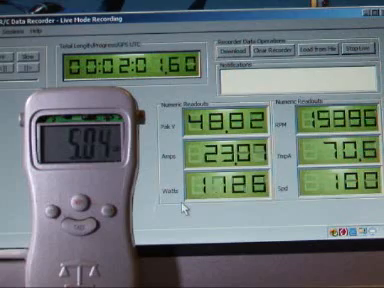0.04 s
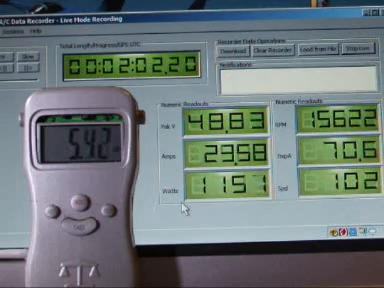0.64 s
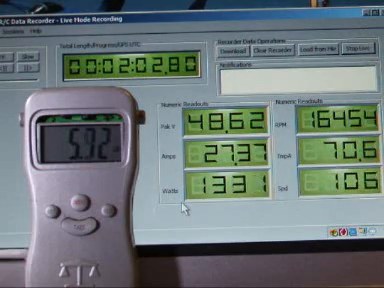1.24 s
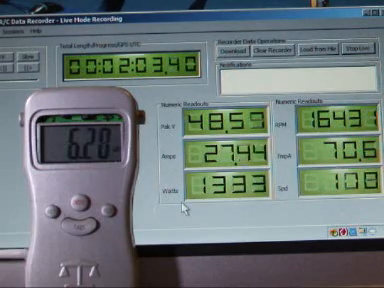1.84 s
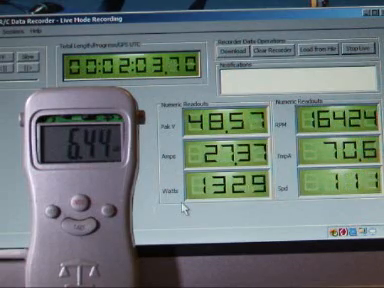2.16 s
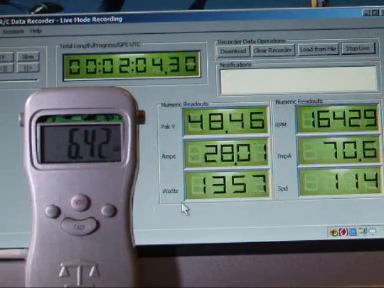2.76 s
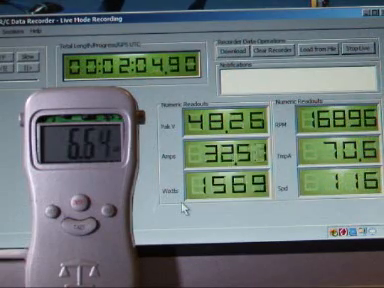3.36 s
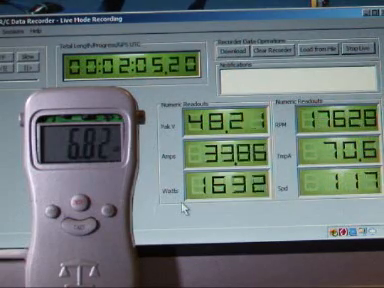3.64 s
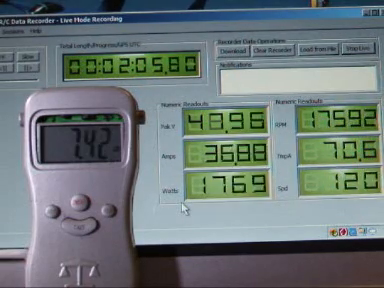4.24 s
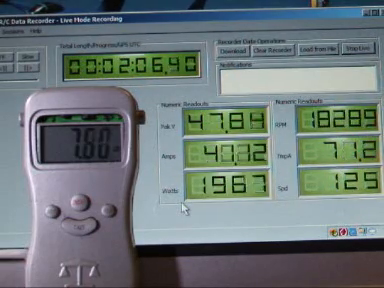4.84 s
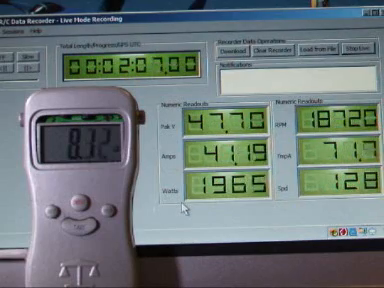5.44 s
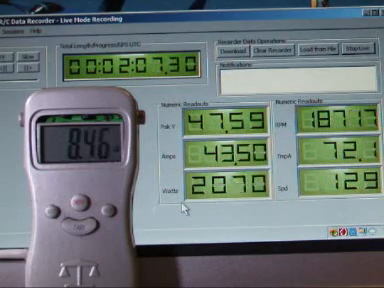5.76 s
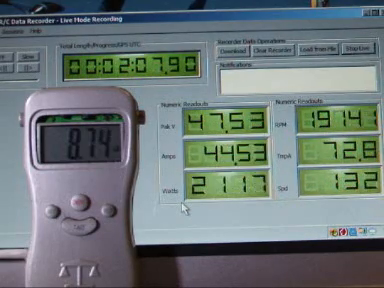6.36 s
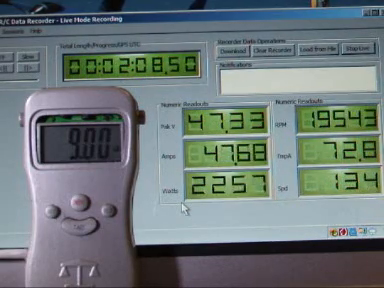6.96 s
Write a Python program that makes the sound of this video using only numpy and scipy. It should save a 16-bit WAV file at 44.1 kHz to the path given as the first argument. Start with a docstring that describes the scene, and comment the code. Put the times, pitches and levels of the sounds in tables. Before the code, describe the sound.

An electric ducted fan runs with a high, fluttering whine over rushing air, its pitch climbing in small steps.

```python
"""First you hear a high, fluttering whine over rushing air: an electric fan spinning inside a tube.
It sits on a test stand and is sped up in small steps, so its tones climb in pitch together.
Its eleven blades chop the swirling air, making the whine and a shriek an octave above it.
The shaft hums, the motor and ball bearings sing through the housing, and the jet of air
buffets the microphone. Twice, a thin whistle from the bearings comes and goes."""
import sys
import numpy as np
from scipy import signal
from scipy.fft import rfft, irfft
from scipy.io import wavfile
from scipy.ndimage import uniform_filter1d

SR = 44100
rng = np.random.default_rng(int(sys.argv[2]) if len(sys.argv) > 2 else 0)


def int16_out(signal):
    """Quantize to a 16-bit WAV file."""
    q = np.round(np.clip(np.atleast_2d(signal).T, -1, 1) * 32767)
    wavfile.write(sys.argv[1], SR, q.astype(np.int16))


N = 317079


def from_db(db):
    """Turn decibels (dB) into a number to multiply a sound by."""
    return 10 ** (np.asarray(db) / 20)


def rms_one(x):
    """Scale a signal so that its average power is 1."""
    return x / np.sqrt(np.mean(np.abs(x) ** 2) + 1e-20)


def drift(rate):
    """A smooth random wobble, about 1 in size; a higher rate (per second) wobbles faster."""
    keep = np.exp(-40 * np.pi * rate / SR)
    noise = rng.standard_normal(N // 20 + 4002)  # one value for every 20 samples
    slow = signal.lfilter([1], [1, -2 * keep, keep * keep], noise)[4000:]  # smoothed twice
    return np.interp(np.arange(N) / 20, np.arange(len(slow)), rms_one(slow))


def level(curve, wobble_db, wobble_rate=7.0, trim_db=0):
    """A volume that follows a table, shifted by trim_db, and swells and fades at random."""
    seconds, db = np.transpose(curve)
    return from_db(np.interp(np.arange(N) / SR, seconds, db) + trim_db + wobble_db * drift(wobble_rate))


def tone(turns, cycles_per_turn, flutter):
    """A tone tied to the shaft and shaken by swirling air; flutter lists (rate, strength in dB) pairs."""
    shake = 1 + sum(from_db(db) * (drift(rate) + 1j * drift(rate)) / np.sqrt(2) for rate, db in flutter)
    phase = 2 * np.pi * (cycles_per_turn * turns + rng.random())
    return np.sqrt(2) * np.real(rms_one(shake) * np.exp(1j * phase))


def boost_db(tone_hz, resonances):
    """How much louder a tone gets near a resonance, a pitch at which a part likes to ring."""
    return sum(boost / (1 + (2 * (tone_hz - hz) / width) ** 2) for hz, width, boost in resonances)


def ringing(tone_hz, resonances, base_db, build_s=.06):
    """The volume of a tone that swells and dies away as it slides through resonances."""
    return from_db(base_db + uniform_filter1d(boost_db(tone_hz, resonances), int(build_s * SR)))


def air_noise(colour):
    """Noise shaped by a table of pitches and strengths, dying away beyond the table's ends."""
    hz, db = np.transpose(colour)
    f = np.maximum(np.arange(N // 2 + 1) * SR / N, 1)
    ends = 1 / (1 + (hz[0] / f / 2) ** 4) / (1 + (f / hz[-1] / 2) ** 8)
    shape = from_db(np.interp(np.log(f), np.log(hz), db)) * ends
    return rms_one(irfft(rfft(rng.standard_normal(N)) * shape, N))


def room(x, echo_db, die_away_s=0.28, even_s=0.17):
    """Echoes of the earlier pitch clash with a sliding tone, so it rasps; slow swells are evened out."""
    t = np.arange(SR // 2) / SR
    echoes = rng.standard_normal(len(t)) * from_db(-60 * t / die_away_s)
    mix = x + from_db(echo_db) * signal.fftconvolve(x, echoes / np.linalg.norm(echoes))[:N]
    return mix / np.sqrt(uniform_filter1d(mix ** 2, int(even_s * SR)) + 1e-9)


# Steps of the throttle. Each row: start in seconds, new shaft speed in turns per second.
SPEED_STEPS = [(0.033, 257.2), (0.548, 261.4), (0.747, 269.7), (0.892, 274.5), (2.614, 277.9),
               (2.828, 282.2), (3.167, 290.3), (3.466, 294.3), (4.185, 297.8), (4.282, 301.6),
               (4.528, 305.8), (4.75, 309.5), (4.88, 312.9), (5.723, 316.1), (5.86, 319.7), (6.757, 326.6)]


def shaft_speed(start_speed=251.4, lag_s=.038):
    """After each step of the throttle, the fan takes a moment to reach its new speed."""
    t = np.arange(N) / SR
    starts, speeds = np.transpose(SPEED_STEPS)
    rises = np.diff(speeds, prepend=start_speed)
    return start_speed + sum(rise * (1 - np.exp(-np.maximum(t - start, 0) / lag_s))
                             for start, rise in zip(starts, rises))


# How loud the two blade tones are. Each row: time in seconds, level in dB before any trim.
WHINE_LEVELS = [(0.0, -29), (0.63, -30), (1.12, -37.5), (1.22, -26.0), (1.82, -34.5), (1.9, -25.5),
                (2.0, -34.5), (2.59, -27.5), (2.65, -24), (2.711, -31.5), (3.31, -33), (3.41, -37.5),
                (3.65, -26.5), (4.24, -29), (4.61, -39.5), (4.76, -31.6), (5.78, -29), (5.94, -38),
                (6.02, -29), (6.57, -25.5), (6.63, -34.5), (6.78, -24), (6.84, -30.5), (7.19, -27.5)]
SHRIEK_LEVELS = [(0.0, -30.4), (0.49, -34), (0.96, -22), (1.02, -29), (1.69, -29), (1.76, -24),
                 (2.2, -33.0), (2.27, -28.5), (2.59, -29.5), (2.65, -24.5), (3.12, -32), (3.31, -20.5),
                 (3.88, -27), (4.1, -22), (4.16, -29.9), (4.69, -20), (5.1, -31.5), (5.49, -25.5),
                 (5.61, -30.5), (6.1, -24), (6.33, -28.5), (6.94, -20.5), (7.1, -29), (7.19, -26)]
# How swirling air shakes them. Each row: rate per second, strength in dB next to the steady tone.
WHINE_SHAKES = [(12, -11.5), (50, -16)]
SHRIEK_SHAKES = [(20, -4), (55, -9)]


def blades(turns, count=11):
    """Blades chop uneven air into a whine; the shriek, an octave up, flutters and echoes more."""
    whine = room(tone(turns, count, WHINE_SHAKES), echo_db=-5)
    shriek = room(tone(turns, 2 * count, SHRIEK_SHAKES), echo_db=-2)
    tips = blade_tips(turns, count, width_hz=78, level_db=-39.5)
    tips += blade_tips(turns, 2 * count, width_hz=160, level_db=-33)
    whine *= level(WHINE_LEVELS, wobble_db=1.3)
    shriek *= level(SHRIEK_LEVELS, wobble_db=1.2, trim_db=-1.46)
    return whine + shriek + tips


def blade_tips(turns, cycles_per_turn, width_hz, level_db):
    """The tips cut through tiny swirls of air, spreading a breathy noise around a blade tone."""
    phase = 2 * np.pi * cycles_per_turn * turns
    return from_db(level_db) * (drift(width_hz) * np.cos(phase) + drift(width_hz) * np.sin(phase))


# Where the test stand rings. Each row: pitch in Hz, width in Hz, boost in dB.
STAND_RINGS = [(272, 15, 6), (316.7, 26, 9)]


def shaft_hum(speed, turns):
    """The slightly unbalanced shaft shakes the stand once every turn."""
    return ringing(speed, STAND_RINGS, base_db=-39.5) * tone(turns, 1, flutter=[(5.3, -23)])


# Where the motor's mount rings. Each row: pitch in Hz, width in Hz, boost in dB.
MOUNT_RINGS = [(1026, 28, 15), (1066, 27, 9), (1139, 29, 11), (1177, 15, 7), (1208, 13, 11), (1235, 8, 9),
               (1577, 67, 13), (1647, 39, 16.5), (1692, 16, 21), (1769, 16, 11), (1824, 42, 11),
               (2259, 16, 28)]


def motor_and_bearings(speed, turns):
    """Tugging magnets and balls rolling round the bearings' two tracks shake the mount."""
    def mount_tone(per_turn, base_db, flutter):
        return ringing(per_turn * speed, MOUNT_RINGS, base_db) * tone(turns, per_turn, flutter)

    magnets = mount_tone(per_turn=6, base_db=-53, flutter=[(6.4, -20)])
    outer_track = mount_tone(per_turn=3.78, base_db=-53, flutter=[(5.8, -15)])
    inner_track = mount_tone(per_turn=6.22, base_db=-51, flutter=[(4.3, -9.5)])
    squeal = mount_tone(per_turn=7.78, base_db=-65.5, flutter=[(10, -16)])  # loud at one speed only
    return magnets + outer_track + inner_track + squeal


# Faint motor and bearing tones. Each entry: cycles per turn of the shaft.
FAINT_PER_TURN = [2, 3, 4, 4.22, 4.61, 5, 5.22, 5.66, 5.78, 6.48, 7, 7.33, 8, 11.72, 12, 12.56, 13.7, 24.69]
# The same tones, in order. Each entry: level in dB before any boost.
FAINT_LEVELS = [-62.5, -68.5, -66, -56.5, -55.5, -60.5, -56, -59.5, -65, -63, -61.5, -62, -61.5, -54.5, -59,
                -50.5, -57.5, -62.5]
# Where the housing rings. Each row: pitch in Hz, width in Hz, boost in dB.
HOUSING_RINGS = [(509, 27, 16), (552.5, 14, 10.5), (1044, 19, 17), (1069, 33, 21.5), (1730, 270, 7.5),
                 (2270, 96, 10)]


def housing(speed, turns):
    """Faint tones swell when the speed carries them to a pitch at which the housing rings."""
    return sum(from_db(db + boost_db(per_turn * speed, HOUSING_RINGS))
               * tone(turns, per_turn, flutter=[(2.8, 0.5)])
               for per_turn, db in zip(FAINT_PER_TURN, FAINT_LEVELS))


# The jet's low, middle and high noise. Each row: pitch in Hz, relative strength in dB.
ROAR_COLOUR = [(90, -15.5), (160, 1), (195, -2), (300, 6), (400, 0.5), (500, -4.5), (565, 3), (660, -1.5),
               (800, -1.5), (1000, 4.5), (1500, -13)]
RUSH_COLOUR = [(700, -34.5), (1100, -2), (1350, -2), (1600, 4.5), (1900, 1.5), (2300, -0.5), (2700, 0),
               (3400, 2), (4200, 1.5), (5000, 2), (6000, 4), (7500, -29)]
HISS_COLOUR = [(4500, -30), (5800, -7.5), (6500, 6.5), (6900, 6), (7300, 7), (7650, 5), (7950, -6.5),
               (8300, -39.5)]
# The volume applied to their mix. Each row: time in seconds, gain in dB.
JET_LEVELS = [(0.0, -33.5), (0.35, -33), (1.4, -34.5), (2.4, -33.5), (2.8, -34.5), (3.2, -34), (3.8, -36.5),
              (4.45, -34.5), (4.7, -36), (5.55, -38), (6.4, -34.5), (6.9, -36.5), (7.19, -36)]


def jet():
    """Churning air leaves the tube; its roar, rush and hiss dip and rise together in volume."""
    roar = from_db(-8.5) * air_noise(ROAR_COLOUR)
    rush = from_db(2) * air_noise(RUSH_COLOUR)
    hiss = from_db(1) * air_noise(HISS_COLOUR)
    return (roar + rush + hiss) * level(JET_LEVELS, wobble_db=.5, wobble_rate=21)


# How hard the air hits the microphone. Each row: time in seconds, level in dB.
WIND_LEVELS = [(0.0, -45.8), (0.55, -44.5), (1.5, -42.5), (2.4, -42.5), (3.7, -46), (4.5, -42.4),
               (5.7, -45), (6.1, -41.5), (7.19, -42)]
# The rumble it makes. Each row: pitch in Hz, relative strength in dB.
WIND_COLOUR = [(10, -5), (22, 4), (35, -9), (50, -5), (70, -10.5), (100, -14), (150, -21), (300, -41)]


def wind_on_microphone():
    """Stirred-up air tumbles over the microphone in uneven gusts."""
    return level(WIND_LEVELS, wobble_db=1) * air_noise(WIND_COLOUR)


# The two bearing whistles. Each row: start in seconds, length in seconds, level in dB.
WHISTLE_TIMES = [(1.54, .19, -44.5), (2.33, .27, -44)]


def bearing_whistle(turns, fade_s=.08):
    """A thin, high tone from the bearings fades in, holds and fades out."""
    t = np.arange(N) / SR
    held = sum(from_db(db) * ((t > start) & (t < start + length)) for start, length, db in WHISTLE_TIMES)
    volume = uniform_filter1d(held, int(fade_s * SR))
    return volume * tone(turns, cycles_per_turn=17.78, flutter=[(10, -19)])


def scene(speed_wobble=0.00066):
    """One shaft, its speed wavering a little under load, drives every tone; air noise is added."""
    speed = shaft_speed() * (1 + speed_wobble * drift(9.6))
    turns = np.cumsum(speed) / SR  # turns made so far
    fan = blades(turns) + shaft_hum(speed, turns) + motor_and_bearings(speed, turns)
    fan += bearing_whistle(turns) + housing(speed, turns)
    return (fan + jet() + wind_on_microphone())[None, :]


def record(dry, cutoff_hz=8100):
    """Cut away the highest treble, as a small camera does."""
    return signal.sosfilt(signal.ellip(12, .1, 90, cutoff_hz, fs=SR, output="sos"), dry)


dry = scene()
out = record(dry)
int16_out(out)
```